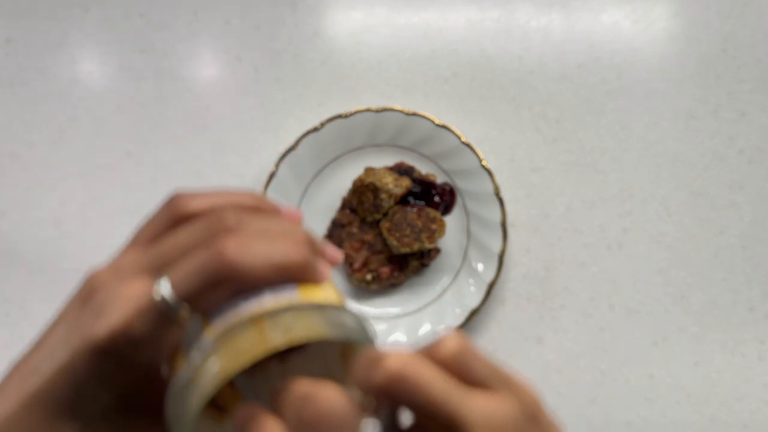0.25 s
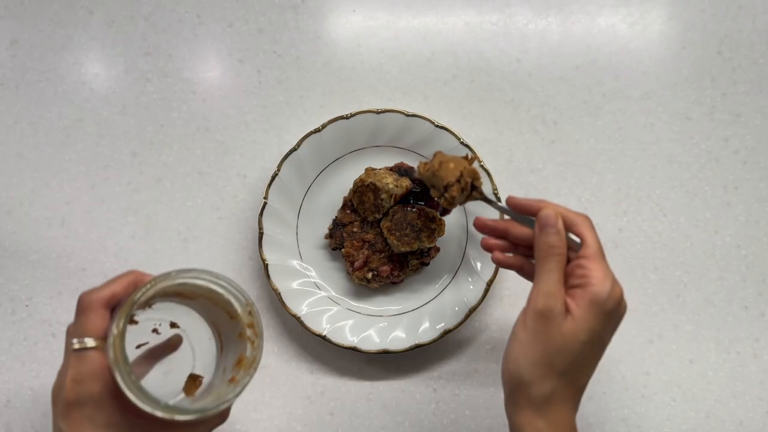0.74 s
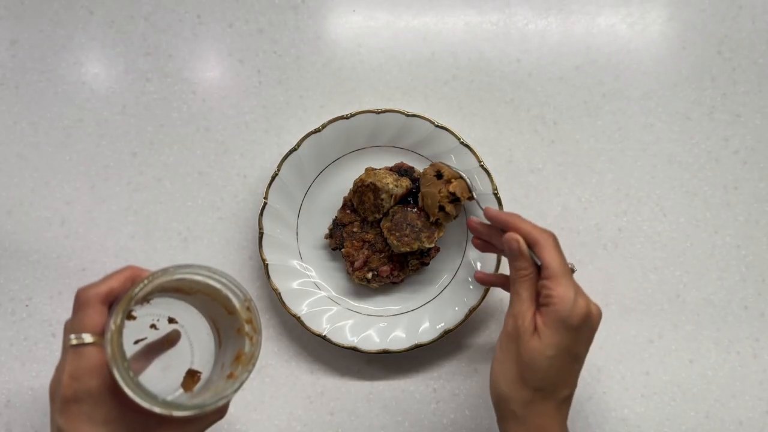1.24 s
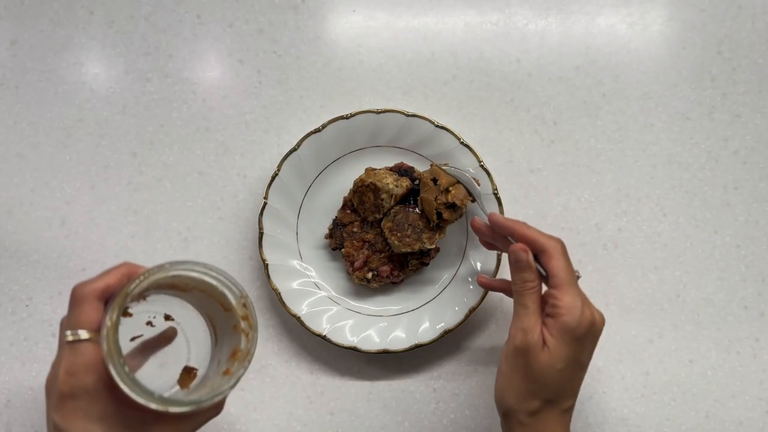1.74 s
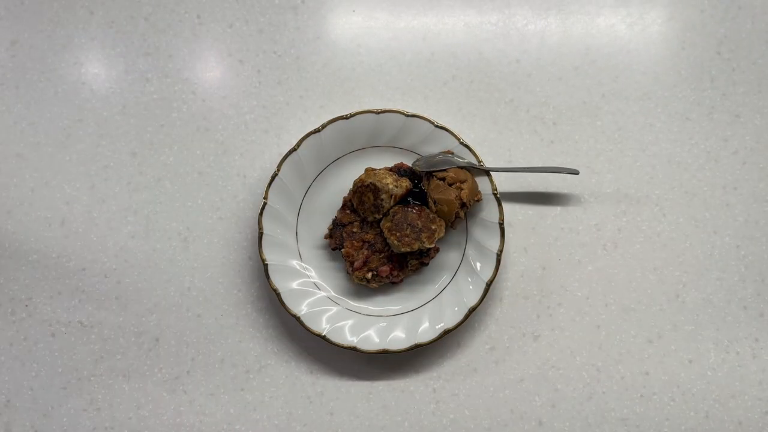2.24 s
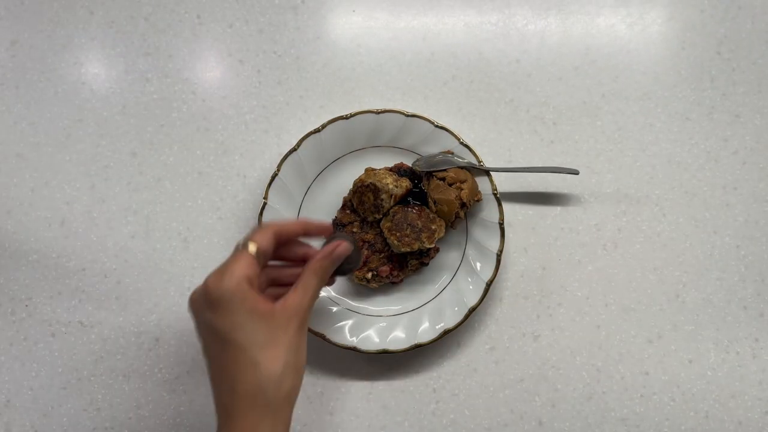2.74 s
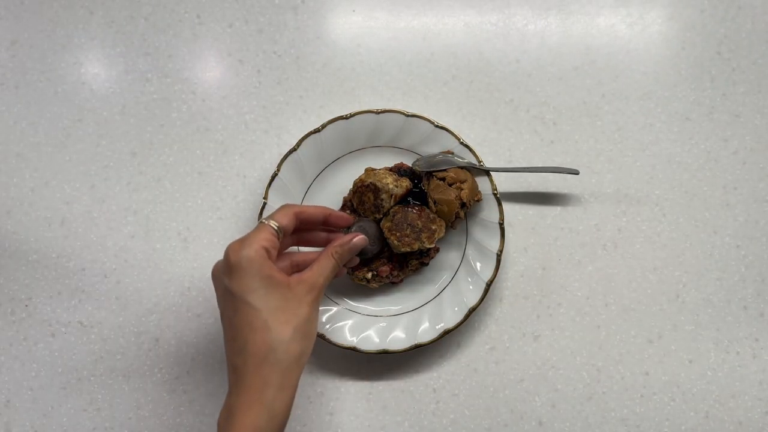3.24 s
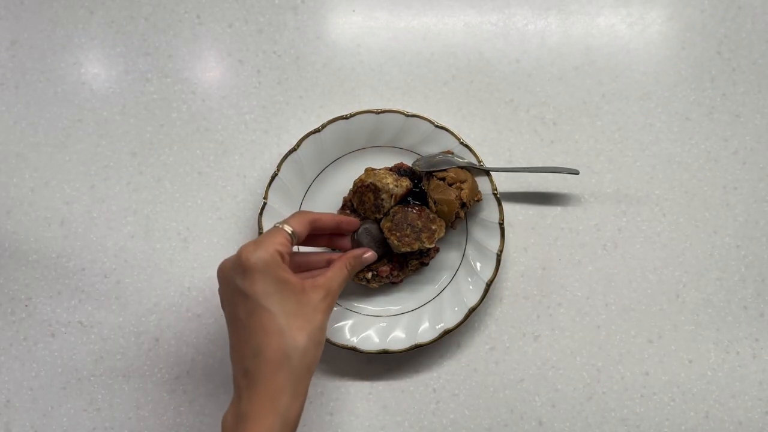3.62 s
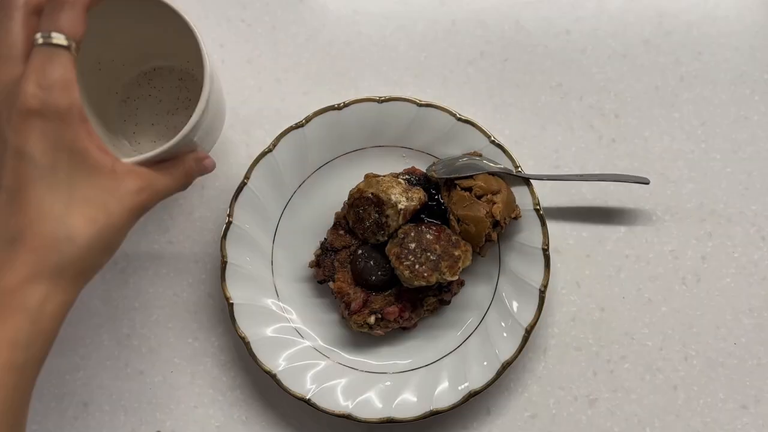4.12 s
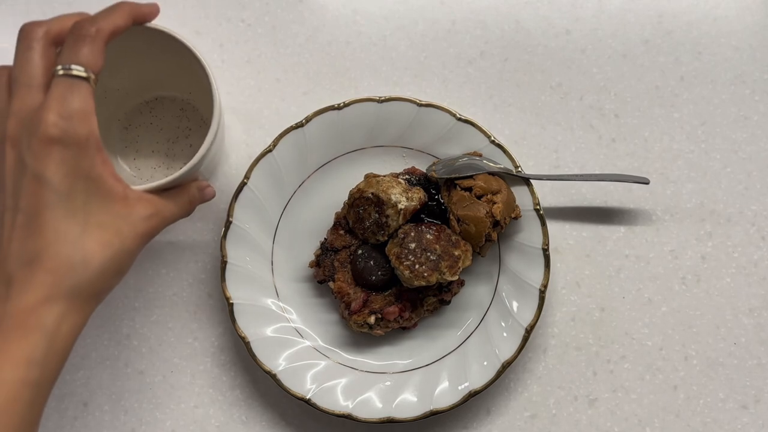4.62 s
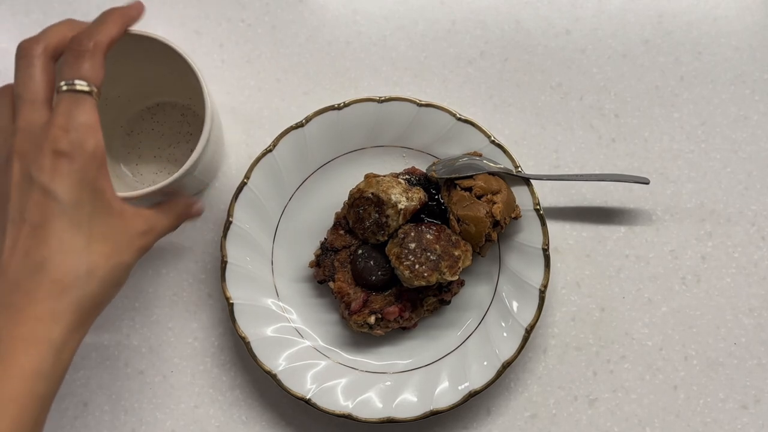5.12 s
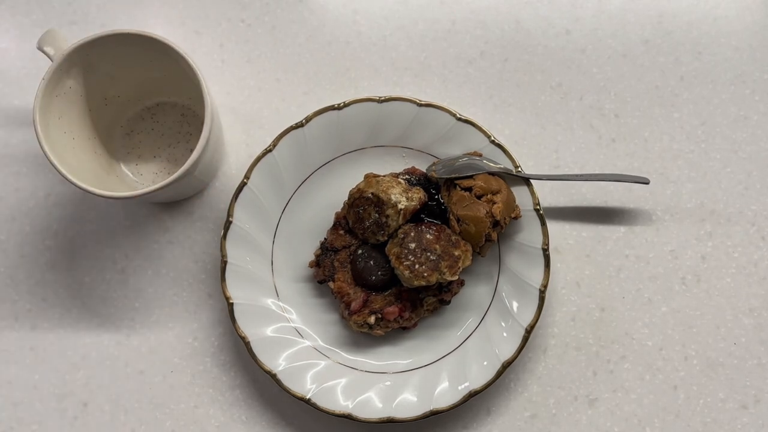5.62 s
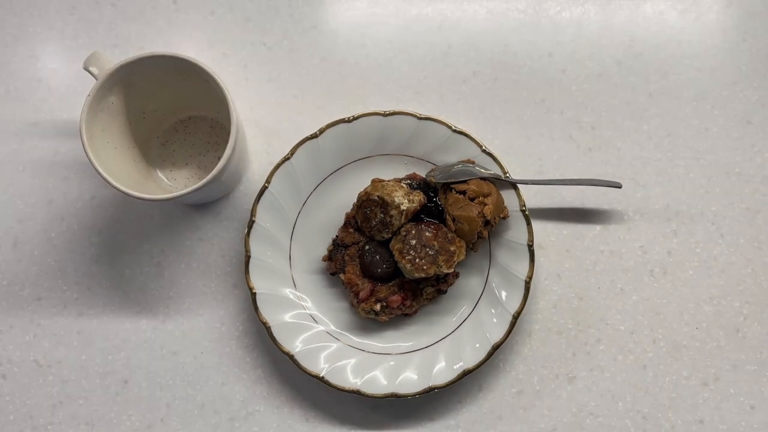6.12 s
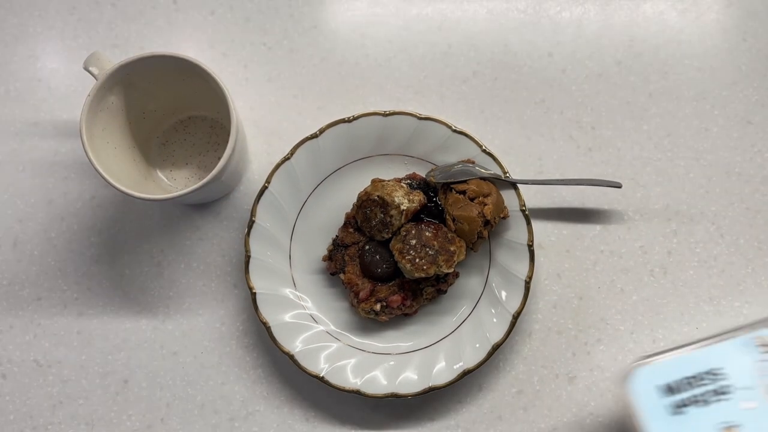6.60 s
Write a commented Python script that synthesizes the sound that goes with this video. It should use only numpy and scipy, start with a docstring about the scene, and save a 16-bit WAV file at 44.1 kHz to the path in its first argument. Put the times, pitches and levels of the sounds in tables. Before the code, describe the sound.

Right at the start, a steel spoon clinks twice in quick succession inside a nearby glass jar, leaving a short, bright ring. A few faint ticks and a light scuff follow. At about 2.1 seconds a door closes on its seal with a deep, soft thump, while its hinge gives a thin, wavering squeak. Around 2.4 seconds stiff packaging crackles in a brief, sharp cluster, and a single tick comes at 3 seconds. At 3.5 seconds a wooden cupboard bangs further away, with a longer echo. At 4.8 seconds a mug knocks onto the counter and settles with a second bump. Light rustles and taps come around 6 seconds, then a carton lands with a hard clack and thud at 6.6 seconds, followed by small knocks. Throughout, a low ventilation rumble with faint hiss fills the kitchen, shifting slightly but abruptly in level four times.

```python
"""A quiet kitchen. First a steel spoon clinks twice in a glass jar and makes it ring. At 2 s a door thumps onto
its seal, its hinge squeaks, and stiff packaging crackles as its folds give way. At 3.5 s a cupboard bangs
further off. At 4.8 s a mug and at 6.6 s a carton knock on the counter. All along, the room echoes over a low
ventilation rumble; four times the background steps abruptly and the echo stops dead."""
import sys
import numpy as np
from scipy import signal
from scipy.fft import rfft, irfft, next_fast_len
from scipy.io import wavfile
from scipy.ndimage import uniform_filter1d

SR = 44100
rng = np.random.default_rng(int(sys.argv[2]) if len(sys.argv) > 2 else 0)


def bounce(signal):
    """Save signal as a 16-bit WAV file at the path given by the first command-line argument."""
    frames = np.transpose(np.atleast_2d(signal))
    limited = np.clip(frames, -1, 1)
    pcm = np.round(limited * 32767).astype(np.int16)
    wavfile.write(sys.argv[1], SR, pcm)


N = 302526

# The jar's own tones; a hand damps most. Ring time (t60) is how long a sound takes to fall 60 dB.
# f/Hz, ring time/s, level struck at the wall/dB, level struck near the base/dB
JAR_TONES = [(870, 0.022, -41.5, -13), (760, 0.19, -65, -50.5), (855, 0.19, -64, -56),
             (980, .2, -64, -51.5), (1620.4, 0.033, -40, -43), (2209, 0.027, -24.5, -24),
             (2174, 0.13, -40.5, -39.5), (2106.4, 0.3, -43, -41.5), (2466, 0.2013, -61.5, -56),
             (2622, 0.02, -25, -22.5), (4250, 0.016, -58, -32), (5040, 0.06, -28, -43),
             (5060, .2, -52.5, -62), (5675, 0.04, -19, -25), (5663, 0.22, -44, -48.5),
             (5695, .16, -51.5, -61.5), (6440, .17, -53.5, -60), (9184, .14, -55.5, -46.5),
             (6780, 0.26, -56, -49), (6870, 0.016, -34, -11.5), (7586, 0.022, -38.5, -30),
             (8290, 0.013, -35.5, -22), (8889, 0.016, -41, -8.5), (8769, 0.37, -58, -46),
             (8539, .19, -60, -49), (8880, .25, -57.5, -50), (9570, 0.029, -37, -15),
             (10482, 0.044, -26.5, -32.5)]
# Spoon hits: t/s, crack level/dB, place (0 wall to 1 base)
SPOON_HITS = [(0.0557, -30.5, 0.24), (0.1839, -30.5, 1)]
def spoon_in_jar():
    """Steel hits glass: clear tones set by where it lands, a gritty crack and a shimmer of weak tones."""
    grip_db, grip_per_s = 4.5, 89.27  # the holding hand makes each tone flutter
    out = np.zeros(N)
    hz, t60, wall_db, base_db = np.transpose(JAR_TONES)
    flutter_onset = 1 - fade(.05, .5)
    for s, crack_db, place in SPOON_HITS:
        levels = wall_db + place * (base_db - wall_db)
        for f, db, ring_s in zip(hz, levels, t60):
            tone = rng.choice([-1, 1]) * ring([f], [db], [ring_s])
            flutter = undb(grip_db * flutter_onset * wander(grip_per_s)[:SR // 2])
            rise_ms = 0.89 + 1500 / f  # low tones build up more slowly
            add(out, s, tone * flutter * swell(rise_ms, SR // 2))
        crack = band(noise(SR // 10), hz=8200, share=2.2) * fade(0.0548, .1)
        shimmer = band(noise(SR // 3), hz=6500, share=0.74) * fade(0.2696, 1 / 3)
        add(out, s, undb(crack_db) * crack)
        add(out, s, undb(crack_db - 14.5) * shimmer)
    return out * (np.arange(N) / SR < AIR_STEPS[1][0])  # stops dead when the background first steps


# The counter slab's own tones: f/Hz, relative level/dB
SLAB_TONES = [(200, -7.5), (340, -6.5), (480, -15.5), (650, 0), (830, 6), (1050, 8), (1250, 5), (1470, 3),
              (1750, -2.5), (1980, -1.5), (2210, 1), (2520, 0), (2800, -1.5), (3200, -11), (7500, -2.5),
              (14500, -17.5)]
# The hollow cabinet below it: f/Hz, relative level/dB, ring time/s
BOOM_TONES = [(61.95, -11.5, 0.304), (87.64, -5, 0.283), (133.5, -1, 0.154)]
# Landings and bounces: t/s, slab level/dB, contact time/ms, clack level/dB, thud f/Hz, thud level/dB,
# thud ring time/s, boom level/dB, slab's bass cutoff/Hz, dull noise level/dB
LANDINGS = [(4.823, -26, 0.257, -27.5, 143.2, -34.5, 0.129, -35.5, 180, -35.5),
            (4.844, -38, 0.49, -46.5, 139.8, -52, 0.067, -53.5, 301.5, -54.5),
            (5.0156, -41.5, 0.37, -56, 257.6, -29.5, 0.061, -32.5, 180, -42),
            (5.022, -38.5, 1, -64.5, 257.6, -46.5, 0.0567, -55.5, 180, -53.5),
            (6.096, -50.5, 0.96, -69, 459.3, -26, 0.0166, -73, 298, -65),
            (6.6382, -23.5, 0.163, -21, 73.8, -32.5, 0.213, -34.5, 538, -36.5),
            (6.6443, -34.5, 0.385, -45.5, 351.4, -44.5, .05, -53.5, 600, -60.5),
            (6.786, -41, 0.83, -71, 696, -48, 0.046, -53.5, 446, -50.5),
            (6.853, -42, 0.31, -47.5, 690, -60.5, 0.031, -55, 500, -65.5)]
def set_down_on_counter():
    """A mug or carton lands and rattles: its hard edge clacks, the slab thuds, the cabinet booms."""
    out = np.zeros(N)
    hz, tone_db = np.transpose(SLAB_TONES)
    slab_t60 = 7.04 / hz + .004  # the damped slab rings for only a few cycles
    for s, db, contact_ms, clack_db, thud_hz, thud_db, thud_t60, boom_db, low_hz, dull_db in LANDINGS:
        slab = ring(hz, db + tone_db, slab_t60)
        slab = signal.sosfilt(signal.butter(2, low_hz, "high", fs=SR, output="sos"), slab)
        rattle = undb(-27) * noise(SR // 10) * fade(.09, .1)
        rattle[0] = 1  # the landing itself
        push = np.hanning(int(contact_ms * SR / 1000) + 3)  # longer contact dulls the blow
        add(out, s, np.convolve(signal.fftconvolve(slab, rattle), push / push.sum()))
        clack = ring([1768, 2075], [clack_db] * 2, t60=[0.0203] * 2)
        add(out, s, clack)
        dull = unit(band(noise(SR // 5), hz=376.4, share=1.003))  # the slab's crowded low tones
        add(out, s, undb(dull_db) * dull * fade(0.178, .2) * swell(9, SR // 5))
        thud = ring([.88 * thud_hz, 1.15 * thud_hz], [thud_db] * 2, [thud_t60] * 2)
        add(out, s, thud * swell(9.76, len(thud)))
        boom = undb(boom_db) * ring(*np.transpose(BOOM_TONES))
        add(out, s + 0.00798, boom * swell(10.6, len(boom)))
    return out


# Low tones of the door's cabinet: f/Hz, level/dB, ring time/s
THUMP_TONES = [(41.9, -32.5, 0.5044), (73.84, -23, 0.466), (96.3, -31, 0.1687), (128, -35.5, 0.13),
               (189.66, -37, 0.2135), (287.3, -43, 0.18), (370.9, -51, 0.13), (549, -39.5, 0.18),
               (775, -52, 0.233)]
def door_thump():
    """A heavy door lands on its soft seal and the cabinet's low tones swell up."""
    out = np.zeros(N)
    tones = ring(*np.transpose(THUMP_TONES))
    add(out, 2.086, tones * swell(21, len(tones)))
    return out


# The stiff packaging's own tones: f/Hz, relative level/dB, ring time/s
PACKAGING_TONES = [(1250, -17, 0.02), (1947, -1, 0.0187), (2343, 2.5, 0.0126), (2792, 0.5, 0.01544),
                   (3238, 0, 0.011), (4600, -14, 0.0047), (7400, -2.5, 0.00632), (8800, -9, 0.00718)]
# Folds giving way: t/s, level/dB, treble tilt around 2500 Hz/(dB per octave)
FOLDS = [(2.3546, -35.5, 5), (2.3674, -28, 3), (2.3718, -36.5, 0.5), (2.378, -37, 2.5),
         (2.3829, -26.5, -0.5), (2.3900, -24.5, -8), (2.3934, -32.5, -1.5), (2.3991, -28, 7.5),
         (2.4052, -16, 1), (2.411, -34.5, 7.5), (2.4259, -48, 4), (2.5130, -33, 1)]
def packaging_cracks():
    """Each fold that gives way rings the same short tones, slightly out of tune."""
    out = np.zeros(N)
    hz, tone_db, t60 = np.transpose(PACKAGING_TONES)
    for s, db, tilt_db in FOLDS:
        bent_hz = hz * (1 + .03 * noise(len(hz)))
        add(out, s, ring(bent_hz, db + tone_db + tilt_db * np.log2(bent_hz / 2500), t60))
    return out


# Blows of the cupboard door: t/s, relative level/dB, bass change below 450 Hz/dB
CUPBOARD_BLOWS = [(3.519, -40, -7.5), (3.545, -45, 11)]
# The wood's tone colour: f/Hz, relative level/dB
WOOD_COLOUR = [(100, -32), (210, -6.5), (250, -23), (290, -10), (340, 1), (420, -16), (560, 5), (750, -5),
               (1100, -7.5), (1450, 0), (1800, -4.5), (2300, -3.5), (3200, -13), (6500, -21.5),
               (10000, -31), (16000, -83)]
def cupboard_bang():
    """A wooden door shuts further off in two quick blows, each a burst of dull noise."""
    out = np.zeros(N)
    size = SR // 5
    hz = np.fft.rfftfreq(size, 1 / SR)
    for s, db, bass_db in CUPBOARD_BLOWS:
        colour = undb(along(WOOD_COLOUR, hz) + bass_db * (hz < 450))
        wood = unit(irfft(rfft(noise(size)) * colour))
        add(out, s, undb(db) * wood * fade(0.198, .2) * swell(22.44, size))
    return out


# Small ticks and scuffs: t/s, level/dB, centre f/Hz, width as a share of the centre, rise time/ms
SMALL_TOUCHES = [(0.584, -54.5, 7750, 2, 1.4), (0.640, -58, 3480, 3.8, 0.51),
                 (0.925, -56, 1070, 0.856, 5.13), (2.093, -42.5, 291, 1.035, 11.3),
                 (2.167, -59.5, 6940, 1.12, 0.44), (2.249, -47, 3530, 2.19, 3.17),
                 (2.288, -50.5, 5870, 0.55, 0.59), (2.315, -52, 6367, 0.83, 0.61),
                 (2.340, -41.5, 2302, 0.51, 1.1), (2.354, -29.5, 6514, 1.6, .5),
                 (2.3667, -20.5, 6800, 1.0, 0.1002), (2.375, -29, 8570, 1.2, .5),
                 (2.4055, -20, 4500, 3.3, 0.11), (2.425, -29, 7021, 1.1, 0.2), (2.485, -35, 1296, 1.85, .3),
                 (2.487, -43.5, 419.6, 0.95, 0.78), (2.494, -40.5, 1110, 0.79, .5),
                 (2.515, -47.5, 709.3, 1.25, 0.59), (3.032, -34.5, 5198, 0.953, 0.224),
                 (3.035, -48.5, 2300, 0.47, 0.82), (3.168, -54, 1493, 0.58, 2.95),
                 (3.201, -60, 2858, 0.43, 0.82), (3.512, -42, 2000, 0.623, 5.3),
                 (4.812, -57, 2093, .4, 3.37), (5.660, -67, 1646, 0.64, 0.268),
                 (5.796, -62.5, 2950, 0.65, 1.7), (5.821, -57.5, 5030, 0.73, 2.13),
                 (5.913, -50.5, 3163, 0.495, 2.6), (6.093, -52, 3170, 0.85, 1.87),
                 (6.118, -56, 3540, 1.2, 0.226), (6.5, -65.5, 7400, 0.4, 0.44),
                 (6.629, -41, 1149, 0.826, 2.84)]
def ticks():
    """Each touch is a snap and a burst of noise; softer ones rise slowly, linger and hardly snap."""
    out = np.zeros(N)
    for s, db, hz, share, rise_ms in SMALL_TOUCHES:
        burst = unit(band(noise(SR // 4), hz, share))
        t60 = 0.011 + 0.0343 * rise_ms
        add(out, s, undb(db) * burst * fade(t60, .25) * swell(rise_ms, SR // 4))
        snap = band(signal.unit_impulse(SR // 50), hz, share)
        snap_db = db + 11.5 - 7 * rise_ms
        add(out, s, undb(snap_db) * snap / np.abs(snap).max())
    return out


# The squeak's path: t/s, f/Hz, level/dB
SQUEAK_PATH = [(2.086, 2546, -60.5), (2.119, 2570, -53.5), (2.146, 2573, -64), (2.178, 2692, -52.5),
               (2.209, 2620, -61), (2.228, 2520, -54), (2.249, 2448, -52), (2.285, 2423, -52),
               (2.317, 2380, -57), (2.351, 2318, -58.5)]
def hinge_squeak():
    """The hinge sticks and slips very fast: a wavering, fluttering tone with two overtones."""
    waver_share, flutter_db = .025, 5.5
    s, hz, db = np.transpose(SQUEAK_PATH)
    t = np.arange(N) / SR
    pitch = np.interp(t, s, hz) * (1 + waver_share * wander(500))
    phase = 2 * np.pi * np.cumsum(pitch) / SR
    tone = np.sin(phase) + undb(-21) * np.sin(2 * phase) + undb(-24.5) * np.sin(3 * phase)
    loudness = undb(np.interp(t, s, db) + flutter_db * wander(200))
    return tone * loudness * ((t > s[0]) & (t < s[-1]))


# Hand movements: peak t/s, relative level/dB, bright part against dull/dB, rise time/s, fall time/s
HANDLINGS = [(0.649, -54.5, -29, 0.0265, 0.0305), (2.092, -52, -14, 0.0056, 0.21),
             (2.392, -35.5, -2.5, 0.0578, 0.05), (2.491, -56.5, 15, 0.069, 0.045),
             (2.688, -62, -8.5, 0.216, 0.064), (5.922, -58, -6, 0.155, 0.0494),
             (6.114, -58.5, -4, 0.0363, 0.0041), (6.32, -62, -4.5, 0.21, 0.15),
             (6.64, -51, 6, 0.00434, 0.041), (6.799, -54.5, -6.5, 0.175, 0.167)]
def rustle():
    """Hands rub packaging: many tiny uneven clicks, dull and bright, that swell and sink away."""
    range_db = 21  # level change over one rise or fall time
    grains = noise((2, N)) * undb(2.2 * rng.exponential(size=(2, N)))
    dull = unit(band(grains[0], hz=1005, share=1.702) * undb(2 * wander(60)))
    bright = unit(band(grains[1], hz=6000, share=1) * undb(2 * wander(60)))
    t = np.arange(N) / SR
    out = np.zeros(N)
    for s, db, bright_db, rise, fall in HANDLINGS:
        from_peak = np.maximum((s - t) / rise, (t - s) / fall)
        out += undb(db - range_db * from_peak) * (dull + undb(bright_db) * bright)
    return out


def first_echoes(near):
    """Sound bounces off worktop, hands and dishes, differently on the left and right."""
    size = SR // 20
    _, spectra = stereo_noise(size)
    echoes = irfft(spectra, size) * fade(t60=.02, seconds=.05)
    echoes /= np.sqrt(np.sum(echoes ** 2) / 2)
    return undb(-6.5) * signal.fftconvolve(near[None], echoes)[:, :N]


# How long the walls echo: f/Hz, ring time before multiplying by stretch/s
WALL_RING = [(125, 0.76), (250, 0.69), (500, 0.33), (1000, 0.4), (2000, 0.3765), (4000, 0.43), (8000, 0.25),
             (14000, 0.023)]
def room_echo(sound, stretch):
    """Hard walls leave a tail, longest in the bass; it stops dead at each step of the background."""
    hz, spectra = stereo_noise(SR)
    centres, t60 = np.transpose(WALL_RING)
    tail = sum(irfft(spectra * weight) * fade(ring_s * stretch, 1)
               for weight, ring_s in zip(band_weights(hz, centres), t60))
    tail = tail * swell(0.94, SR) / np.sqrt(np.sum(tail ** 2) / 2)
    edges = [int(s * SR) for s, *_ in AIR_STEPS] + [N]
    return np.hstack([signal.fftconvolve(sound[None, start:end], tail)[:, :end - start]
                      for start, end in zip(edges, edges[1:])])


# The ventilation's tone colour: f/Hz, relative level/dB
AIR_COLOUR = [(20, -30.5), (48, 0), (65, 1.5), (120, -1), (160, -13), (310, -17.5), (600, -24),
              (1000, -28.5), (1300, -35.5), (2200, -35), (3300, -44.5), (5000, -54), (9500, -57),
              (11000, -70.5)]
# Pitches that stand out of it: f/Hz, width/Hz, boost/dB
AIR_PEAKS = [(848.7, 66, 11.5), (6150, 1300, 9)]
# Sudden steps in the background: t/s, level change/dB, extra hiss above 1000 Hz/dB
AIR_STEPS = [(0, -1.2, 5), (0.399, -1.04, -1.55), (2.081, -0.5, 4.5), (4.077, -0.8834, -0.71),
             (6.122, -2, 0.5)]
def ventilation():
    """Moving air rumbles and hisses; each band wavers a little and the level jumps at every step."""
    level_db, waver_db = -51, 0.93
    size = next_fast_len(N)
    hz, spectra = stereo_noise(size)
    colour = undb(along(AIR_COLOUR, hz) + sum(bump(hz, *peak) for peak in AIR_PEAKS))
    centres = 40 * 2. ** np.arange(9)
    s, step_db, hiss_db = np.transpose(AIR_STEPS)
    step = np.searchsorted(s, np.arange(N) / SR, "right") - 1
    air = np.zeros((2, N))
    for f, weight in zip(centres, band_weights(hz, centres)):
        octave = irfft(spectra * colour * weight, size)[:, :N]
        air += octave * undb(waver_db * wander(4.9) + hiss_db[step] * (f > 1000))
    return unit(air) * undb(level_db + step_db[step])


# How alike left and right are: f/Hz, likeness (0 to 1)
STEREO_LIKENESS = [(60, 1), (130, 0.99), (290, 0.9), (640, 0.4), (1400, 0.2), (3100, 0.4), (6800, 0.05),
                   (15000, 0.9)]
def stereo_noise(size):
    """Frequencies and left and right spectra of noise from all around, most alike in the bass."""
    hz = np.fft.rfftfreq(size, 1 / SR)
    alike = along(STEREO_LIKENESS, hz)
    mid, side = rfft(noise((2, size)))
    return hz, mid * np.sqrt(1 + alike) + side * np.sqrt(1 - alike) * np.array([[1], [-1]])


def noise(size):
    return rng.standard_normal(size)


def undb(db):
    return 10 ** (np.asarray(db) / 20)


def unit(x):
    """Scale to an average power of 1."""
    return x / np.sqrt(np.mean(x ** 2))


def add(out, s, sound):
    """Mix a sound in, starting at s seconds."""
    i = min(int(s * SR), len(out))
    out[i:i + len(sound)] += sound[:len(out) - i]


def swell(ms, size):
    """A smooth rise from 0 to 1."""
    return np.sin(np.pi / 2 * np.clip(np.arange(size) / (ms * SR / 1000), 0, 1)) ** 2


def fade(t60, seconds):
    """A fall of 60 dB every t60 seconds."""
    return np.exp(-np.log(1000) * np.arange(int(seconds * SR)) / SR / t60)


def ring(hz, db, t60):
    """Tones dying away after one blow; neighbours start in opposite directions."""
    t = np.arange(SR // 2) / SR
    return sum((-1) ** k * undb(level) * np.sin(2 * np.pi * f * t) * fade(ring_s, .5)
               for k, (f, level, ring_s) in enumerate(zip(hz, db, t60)))


def wander(per_s):
    """Glide between random values, roughly within -1 to 1."""
    hold = int(SR / per_s)
    return 1.2 * uniform_filter1d(np.repeat(noise(N // hold + 1), hold), hold)[:N]


def band(x, hz, share):
    """Keep a band around hz, share times hz wide."""
    edge = np.sqrt(1 + share ** 2 / 4) + share / 2
    limits = [hz / edge, min(hz * edge, .45 * SR)]
    return signal.sosfilt(signal.butter(2, limits, "band", fs=SR, output="sos"), x)


def along(table, hz):
    """Read between the rows of a (f/Hz, value) table on a pitch scale."""
    f, value = np.transpose(table)
    return np.interp(np.log(hz + 1), np.log(f), value)


def band_weights(hz, centres):
    """Overlapping bands that add up to one."""
    return [along(list(zip(centres, row)), hz) for row in np.eye(len(centres))]


def bump(hz, centre_hz, width_hz, db):
    """A rounded boost in dB around one frequency."""
    return db / (1 + (2 * (hz - centre_hz) / width_hz) ** 2)


def scene():
    """Mix the direct sounds, their echoes and the ventilation."""
    jar = spoon_in_jar()
    crackle = ticks() + packaging_cracks()
    counter = set_down_on_counter()
    door, hinge, hands, cupboard = door_thump(), hinge_squeak(), rustle(), cupboard_bang()
    direct = jar + crackle + counter + hinge + undb(-1) * hands + undb(8) * cupboard
    to_walls = (undb(-16) * jar + undb(-11.5) * crackle + undb(-12.5) * (counter + door)
                + undb(4) * hinge + undb(-9.5) * hands)
    echoes = first_echoes(direct) + room_echo(to_walls, stretch=0.913)
    far_echo = room_echo(undb(6) * cupboard, stretch=2.604)  # the far end of the flat rings longer
    return direct + door + echoes + far_echo + ventilation()


# How much louder the left microphone is: f/Hz, left minus right level/dB
LEFT_LEVEL = [(60, 0.08), (130, 0.41), (300, 2.5), (600, 3.5), (1100, -0.12), (10000, 0)]
# How far its wave runs ahead (negative is behind): f/Hz, phase/radians
LEFT_PHASE = [(3000, 0), (5500, -.4), (7500, -1.3), (10000, -2.9), (13500, -3.3), (16000, -3.9)]
def record(dry):
    """Two microphone openings lift the high treble and differ a little; the very top is cut off."""
    top_hz = 16300
    size = next_fast_len(N + 1000)
    hz = np.fft.rfftfreq(size, 1 / SR)
    lift = undb(bump(hz, centre_hz=15300, width_hz=1300, db=9.9))
    left = undb(along(LEFT_LEVEL, hz)) * np.exp(1j * along(LEFT_PHASE, hz))
    right = np.ones_like(left)
    heard = irfft(rfft(dry, size) * lift * np.array([left, right]), size)[:, :N]
    return signal.sosfilt(signal.ellip(10, .2, 80, top_hz, fs=SR, output="sos"), heard)


dry = scene()
out = record(dry)
bounce(out)
```